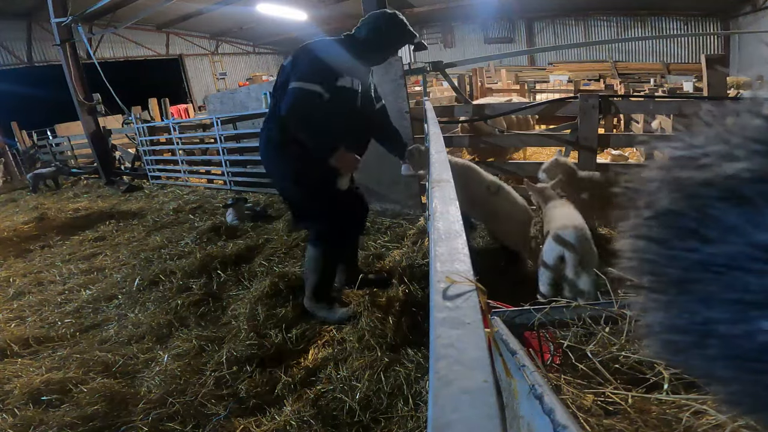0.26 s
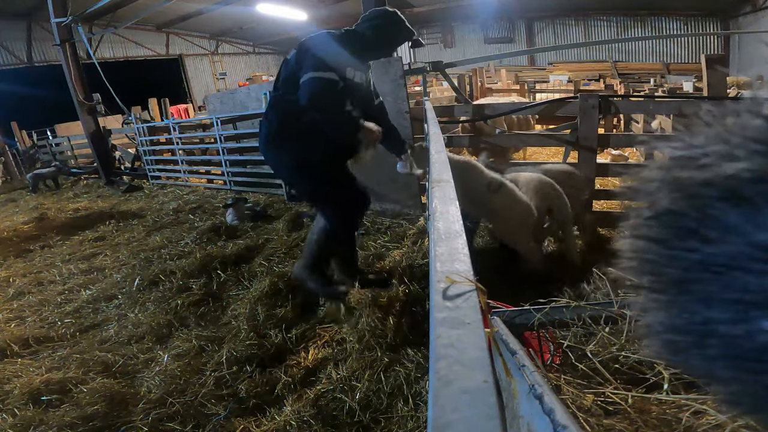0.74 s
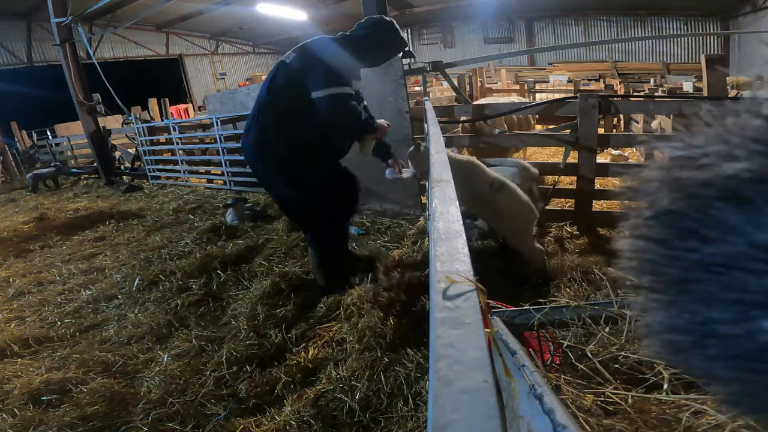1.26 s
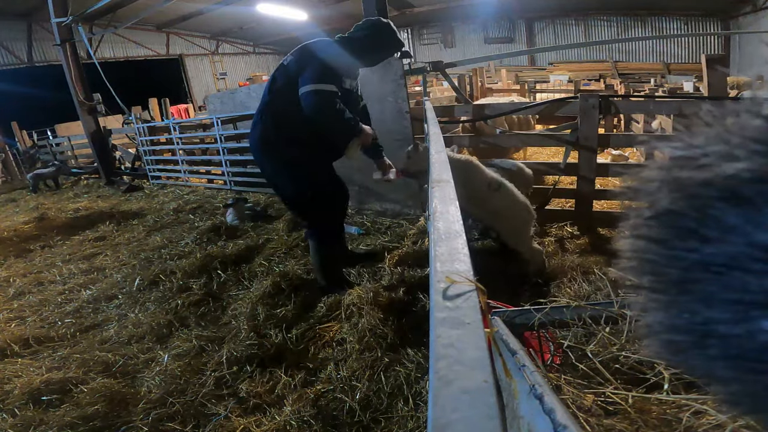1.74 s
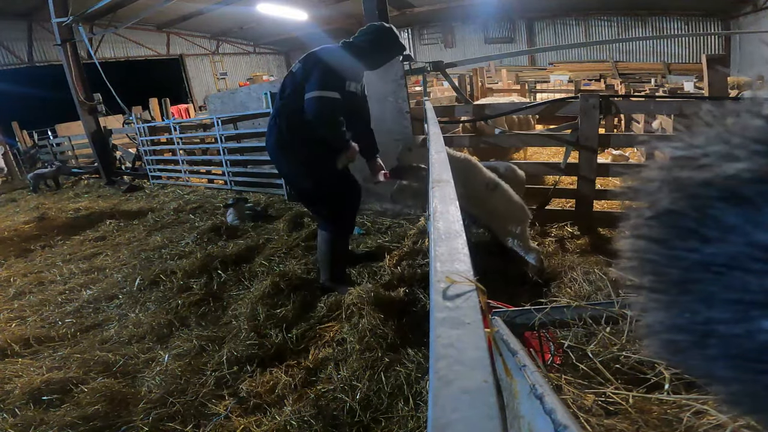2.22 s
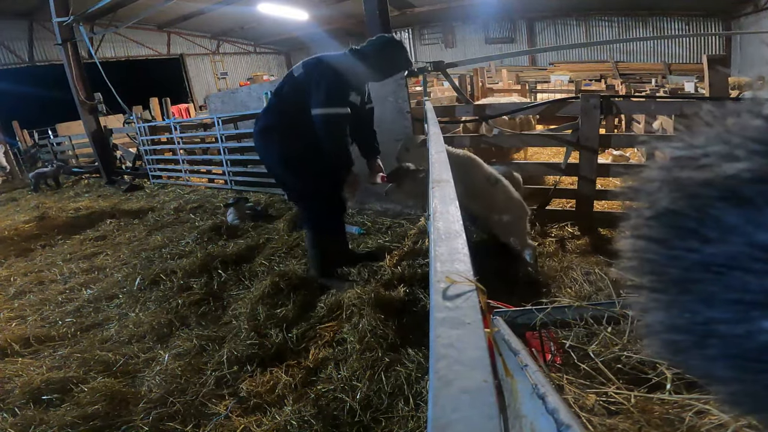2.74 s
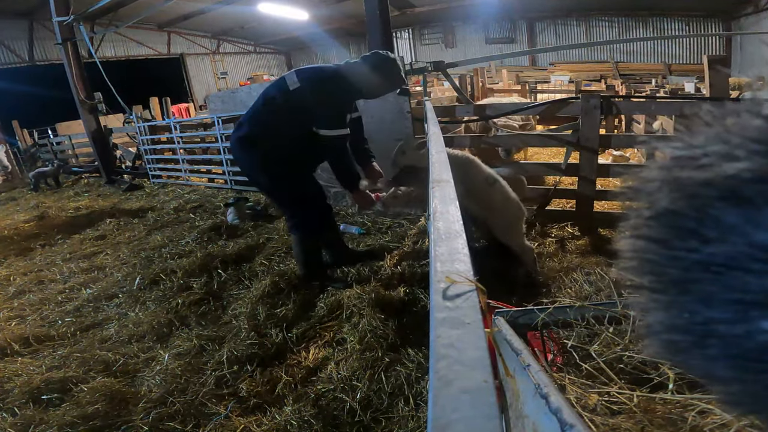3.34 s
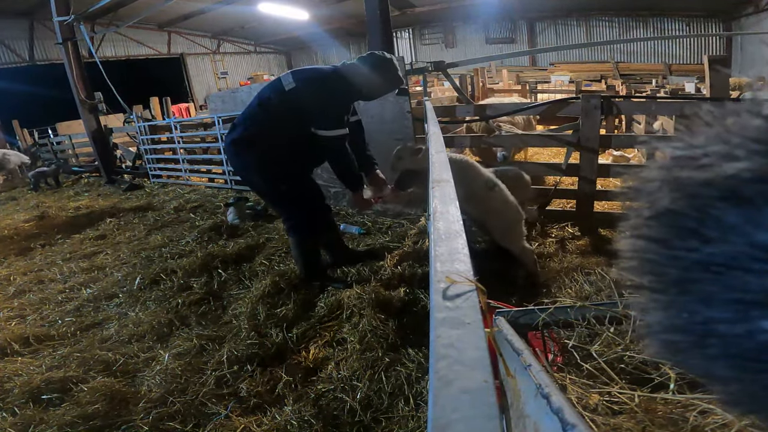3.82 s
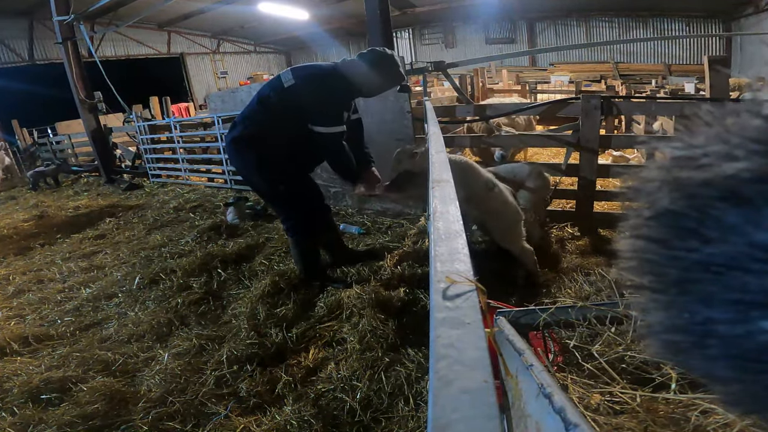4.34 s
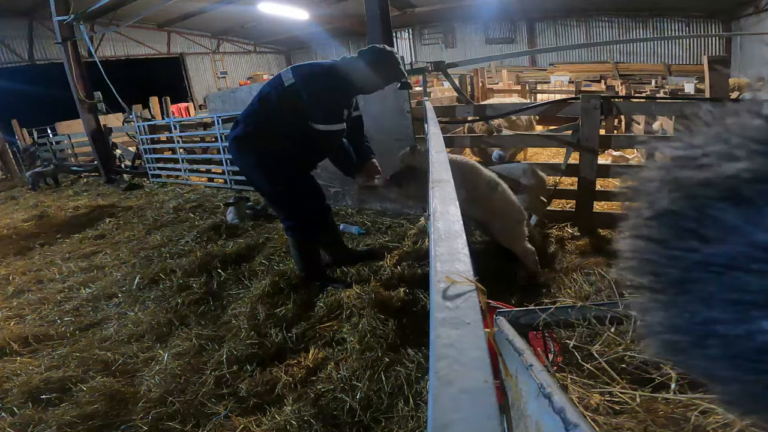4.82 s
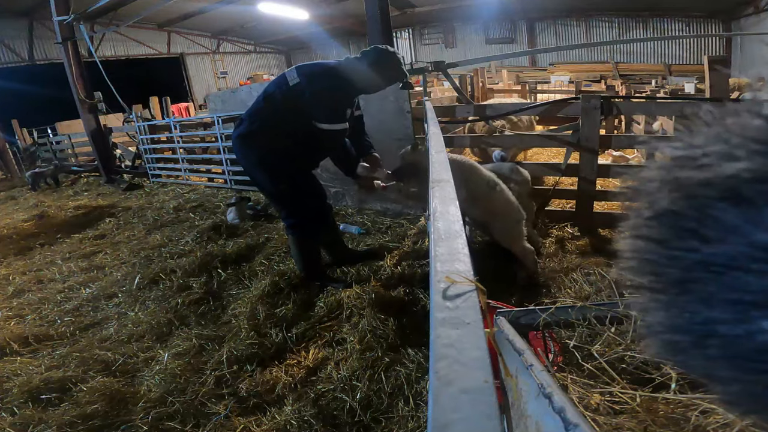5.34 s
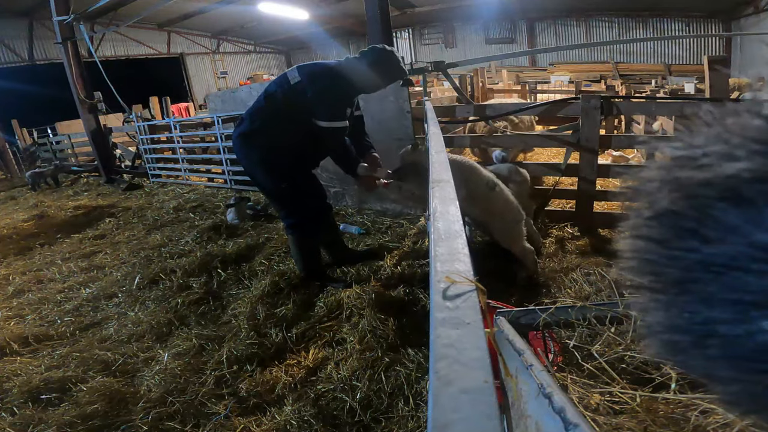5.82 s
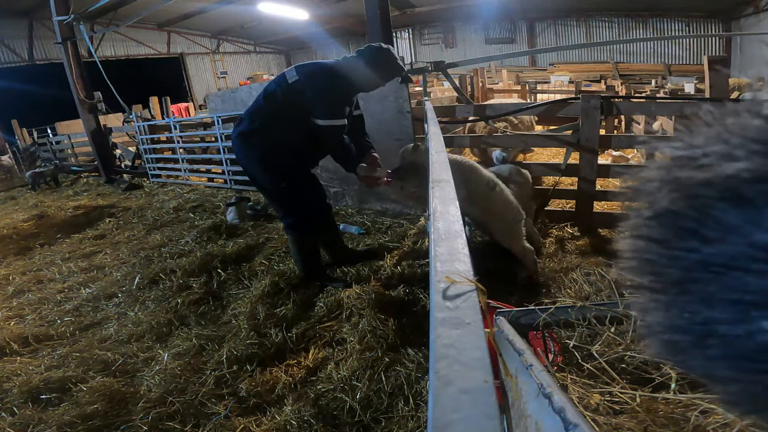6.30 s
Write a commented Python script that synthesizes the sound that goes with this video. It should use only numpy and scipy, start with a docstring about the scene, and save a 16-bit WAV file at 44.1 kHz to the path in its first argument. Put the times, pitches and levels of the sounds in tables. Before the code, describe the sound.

Lambs suck softly and shuffle in straw over the low drone of an idling diesel engine; a fence panel is knocked once.

```python
"""A three-cylinder diesel engine idles outside a lambing shed, droning, knocking and ticking.
Thin, high whines waver over it. At a pen close by, feet rustle and snap the straw, and feeding lambs
make wet smacks and a squeak as air slips past the teat; there is one low, hollow tap like a hoof or boot.
A hurdle (a fence panel) is knocked once and echoes under the roof.
The camera sways and is bumped softly, which adds a deep rumble."""
import sys
import numpy as np
from scipy import signal
from scipy.fft import rfft, irfft, next_fast_len
from scipy.io import wavfile
from scipy.ndimage import map_coordinates

SR = 44100
rng = np.random.default_rng(int(sys.argv[2]) if len(sys.argv) > 2 else 0)


def wav_out(sig):
    """Save sig, one row per channel (or a flat mono array), as 16-bit PCM at SR to the path in sys.argv[1]."""
    wavfile.write(sys.argv[1], SR, np.round(np.clip(np.atleast_2d(sig).T, -1, 1) * 32767).astype(np.int16))


N = 289721
TIME = np.arange(N) / SR

# Engine speed; in one cycle every cylinder fires once: time_s, cycles_per_s
IDLE_SPEED = [(0, 10.153), (1, 10.186), (2, 10.199), (4, 10.195), (6.5, 10.189)]


def amp(db):
    """Turn decibels into a number to multiply by."""
    return 10 ** (np.asarray(db) / 20)


def unit(x):
    """Scale a sound so its average strength (rms) is 1."""
    return x / np.sqrt(np.mean(x ** 2) + 1e-20)


def along(points, hz):
    """Read between (pitch_hz, value) points, with octaves evenly spaced."""
    pitches, values = np.transpose(points)
    return np.interp(np.log(hz + 1e-6), np.log(pitches), values)


def curves(rows):
    """Turn rows that start with a time into one curve for each other column."""
    times, *columns = np.transpose(rows)
    return [np.interp(TIME, times, column) for column in columns]


def wobble(rate):
    """A smooth curve through `rate` random values a second."""
    values = rng.standard_normal(int(N * rate / SR) + 4)
    return np.interp(TIME, TIME[::32], map_coordinates(values, [TIME[::32] * rate]))


def die_away(t, fade_s):
    """A fade that falls by 60 dB in fade_s seconds."""
    return np.exp(-np.log(1000) * t / fade_s)


def coloured(x, spectrum, tilt_db=0):
    """Set a sound's bass and treble, at strength 1; tilt_db is added per octave above 500 Hz."""
    size = next_fast_len(len(x))
    hz = np.fft.rfftfreq(size, 1 / SR)
    octaves = np.log2(np.maximum(hz, 500) / 1000)
    gain = amp(along(spectrum, hz) + tilt_db * octaves)
    return unit(irfft(rfft(x, size) * gain, size)[:len(x)])


def noise(spectrum, size=N, tilt_db=0):
    """Noise of strength 1 with the given balance of bass and treble."""
    return coloured(rng.standard_normal(size), spectrum, tilt_db)


def add(track, start_s, sound):
    """Mix a sound into the track at start_s."""
    part = track[max(round(start_s * SR), 0):][:len(sound)]
    part += sound[:len(part)]


def camera_handling(rumble_db=-15.5, rumble_growth=1.12, rub_db=-16):
    """The camera rocks and rumbles as it moves; bumps make its mount shudder and rub."""
    # How strongly the camera sways: time_s, level_db
    movement = [(0, -29), (.55, -41.5), (1.25, -23.5), (1.57, -33), (2.15, -23), (3.3, -28), (3.72, -20),
                (3.95, -30), (4.2, -26), (4.6, -33), (5.6, -30), (6, -39.5), (6.57, -34.5)]
    # Tone of the sway, the rumble and the rubbing: pitch_hz, relative_db
    sway_tone = [(1, -49), (5, -3.5), (9, -20.5), (13, 3), (19, -9), (26, -13), (40, -27.5), (80, -86),
                 (200, -120)]
    rumble_tone = [(10, -2), (30, 1), (45, 3.5), (62, -2.5), (76, -22), (100, -7), (185, -22.5), (260, -45),
                   (600, -53), (2000, -120)]
    rub_tone = [(20, -2.5), (55, 8.5), (78, -13.5), (100, 1), (140, -15), (190, -9), (250, -24), (600, -56),
                (2000, -120)]
    # Soft bumps: peak_s, level_db, pitch_hz, half_length_s
    bumps = [(0.684, -25.5, 34, 0.057), (2.058, -30.5, 51, 0.089), (2.202, -25.5, 33.3, 0.045),
             (2.574, -16, 31.4, 0.041), (2.94, -20.5, 28.8, 0.084), (3.973, -29, 33.5, 0.033),
             (4.095, -18.5, 29.7, 0.081), (5.529, -42, 29.6, 0.068)]
    sway_db, = curves(movement)
    rumble_gain = amp(sway_db.mean() + rumble_db + rumble_growth * (sway_db - sway_db.mean()))
    out = amp(sway_db) * noise(sway_tone) + rumble_gain * noise(rumble_tone)
    rub = amp(rub_db) * noise(rub_tone)
    for peak_s, db, hz, half_length_s in bumps:
        t = TIME - peak_s
        shudder = np.exp(-(t / half_length_s) ** 2) * np.cos(2 * np.pi * hz * t)
        out += amp(db) * (shudder + np.exp(-np.abs(t) / (2 * half_length_s)) * rub)
    return out


def shed_echo(x, build_s=0.034):
    """Echoes from the roof and far walls build up, then die away, the treble first."""
    # How long the echo lasts: pitch_hz, fade_s
    echo_times = [(150, 0.546), (600, 0.84), (2000, 0.53), (4000, 0.42), (8000, 0.24), (14000, 0.091)]
    hz, t, bands = signal.stft(rng.standard_normal(SR), SR, nperseg=256)
    shape = die_away(t, along(echo_times, hz)[:, None]) * (1 - np.exp(-(t / build_s) ** 2))
    tail = signal.istft(bands * shape, SR, nperseg=256)[1]
    return signal.fftconvolve(x, tail / np.linalg.norm(tail))[:N]


def straw_rustle(grain_db=2.0, fidget_db=1.5, rise_share=0.42):
    """Many tiny stalks rub together, swelling each time a foot sweeps through."""
    # The faint rustle, which dips as the lambs settle to feed: time_s, level_db
    restlessness = [(0, -64), (1.6, -68), (2.4, -61), (3.1, -67), (3.7, -64), (5.05, -77.5), (6.57, -68.5)]
    # Sweeps of a foot: peak_s, level_db, length_s
    sweeps = [(0.042, -61.5, 0.12), (0.263, -61, 0.11), (0.407, -59, 0.033), (0.533, -63, .08),
              (0.793, -59.5, 0.29), (0.944, -55.5, 0.072), (1.355, -60, 0.24), (1.87, -64.5, 0.25),
              (2.86, -59.5, .11), (3.32, -62, 0.08), (3.865, -61, 0.039), (4.05, -65, 0.11),
              (4.2, -62.5, 0.049), (4.335, -67, .03), (4.475, -65, 0.12), (4.675, -65.5, 0.15),
              (5.286, -64, .08), (5.465, -64, .05), (5.85, -67, 0.14), (6.194, -63, .16),
              (6.545, -63, 0.097)]
    # Tone of the rustle: pitch_hz, relative_db
    straw_tone = [(300, 6), (1000, 4), (2500, 5.5), (5000, 2), (6500, 7), (8200, 9.5), (10000, 3.5),
                  (13000, 3.5), (15500, -0.5)]
    power = amp(curves(restlessness)[0] + fidget_db * wobble(18)) ** 2
    for peak_s, db, length_s in sweeps:
        width_s = length_s * np.where(TIME < peak_s, rise_share, 1 - rise_share)
        power += amp(db) ** 2 * np.exp(-np.minimum(((TIME - peak_s) / width_s) ** 2, 20))
    grains = rng.standard_normal(N) * amp(grain_db * wobble(900))
    return np.sqrt(power) * coloured(grains, straw_tone)


def straw_snaps():
    """Stalks bend, give way and settle."""
    # Snaps, scuffs and steps: peak_s, level_db, rise_s, fade_s, brightness_db_per_octave
    snaps = [(0.251, -48, 0.012, 0.04, -3), (0.527, -55, .002, .04, 16), (0.962, -43.5, 0.019, .11, -5.5),
             (1.054, -48, 0.014, 0.16, -12), (1.9, -50, 0.0019, 0.044, -3),
             (1.985, -37, 0.005, 0.046, -4.5), (1.989, -37, 0.0013, 0.026, 6),
             (1.996, -43.5, 0.0042, 0.26, -3), (2.191, -47, 0.0029, 0.044, -3), (2.871, -55, 0.03, .1, 1),
             (3.33, -50.5, 0.03, 0.087, 0.5), (3.486, -49.5, 0.0098, 0.092, -1.5),
             (3.722, -43.5, 0.00084, 0.065, -6.5), (3.824, -43.5, .002, 0.018, 1),
             (5.274, -41.5, 0.00055, 0.021, 1), (6.24, -56, .02, .15, -2)]
    # Tone of a stalk: pitch_hz, relative_db
    stalk_tone = [(200, -19), (550, -0.5), (1000, 3.5), (1200, -2), (1620, 8), (2800, -0.5), (4350, 0.5),
                  (5500, -1.5), (6700, -6), (8100, 4), (9500, -11), (13000, -14.5), (15500, -32)]
    out, t = np.zeros(N), np.arange(-SR // 8, SR // 4) / SR
    for peak_s, db, rise_s, fade_s, bright_db in snaps:
        shape = np.where(t < 0, np.exp(-np.abs(t) / rise_s), die_away(np.abs(t), fade_s))
        add(out, peak_s + t[0], amp(db) * shape * noise(stalk_tone, len(t), tilt_db=bright_db))
    return out


def hollow(hz, size, sharpness=4.75):
    """Noise narrowed around one pitch, as in a hollow such as a mouth."""
    b, a = signal.iirpeak(hz, sharpness, SR)
    hiss = signal.lfilter(b, a, rng.standard_normal(size))
    return unit(signal.lfilter(b, a, hiss))  # a second pass narrows it further


def sucking_and_tap(second_db=-3, roughness=0.53):
    """Air slips past the teat in wet smacks and a falling squeak; one low tap is like a hoof or boot."""
    # Smacks, and the tap at 3.726 s: peak_s, level_db, half_length_s, main_pitch_hz, second_pitch_hz
    bursts = [(2.512, -50.5, 0.015, 2320, 3400), (2.726, -48, 0.007, 2230, 3160),
              (2.983, -53, .008, 2230, 3200), (3.726, -36.5, 0.0056, 1030, 610),
              (4.919, -45.5, 0.003, 2280, 2850), (6.237, -56, 0.024, 3450, 2770),
              (6.503, -52, 0.0078, 3280, 3950)]
    # The teat's squeak: time_s, pitch_hz, level_db
    squeak = [(4.735, 1145, -60), (4.752, 1077, -50), (4.77, 915, -46), (4.783, 950, -45), (4.8, 940, -66)]
    out, t = np.zeros(N), np.arange(-SR // 16, SR // 16) / SR
    for peak_s, db, half_length_s, main_hz, second_hz in bursts:
        burst = unit(hollow(main_hz, len(t)) + amp(second_db) * hollow(second_hz, len(t)))
        add(out, peak_s + t[0], amp(db) * np.exp(-(t / half_length_s) ** 2) * burst)
    pitch_hz, level_db = curves(squeak)
    tone = unit(np.sin(2 * np.pi * np.cumsum(pitch_hz) / SR) * (1 + roughness * wobble(400)))
    squeaking = (TIME > squeak[0][0]) & (TIME < squeak[-1][0])
    return out + amp(level_db) * tone * squeaking


def hurdle_knock(ring_db=-5, crack_db=-0.5, rattle=0.023, rise_s=0.0028):
    """Each contact cracks and sets the hurdle ringing; its loose joints blur the notes."""
    # Three quick contacts that make one knock: start_s, level_db
    contacts = [(3.845, -39), (3.853, -33), (3.889, -42)]
    # The notes the hurdle rings at: pitch_hz, relative_db, fade_s
    notes = [(181.3, 7.5, 0.43), (366, -8.5, 0.13), (430, -2.5, 0.25), (573, -2, 0.12), (768, -9.5, 0.34),
             (997, -12.5, 0.24), (1320, -16, 0.12), (1740, -5, 0.13), (2160, -14, .15), (2620, -13, .12),
             (5540, -15, .06)]
    # Tone of the crack: pitch_hz, relative_db
    crack_tone = [(100, -24), (300, 2), (550, 8), (1050, -2), (1400, 2.5), (2000, 2), (2700, -3),
                  (3600, -8), (4700, -12), (5700, -5.5), (7000, -11.5), (8500, -12.5), (11000, -21.5),
                  (15000, -42)]
    out, t = np.zeros(N), np.arange(SR // 2) / SR
    for start_s, db in contacts:
        sound = amp(crack_db) * die_away(t, fade_s=0.16) * noise(crack_tone, len(t))
        for hz, note_db, fade_s in notes:
            phase = 2 * np.pi * np.cumsum(hz * (1 + rattle * wobble(310)[:len(t)])) / SR
            sound += amp(ring_db + note_db) * die_away(t, fade_s) * np.sin(phase)
        add(out, start_s, amp(db) * (1 - np.exp(-t / rise_s)) * sound)
    return out


def whines(wander_db=1.3, flutter_db=4.0, drift_hz=15, swell_db=7, swell_half_s=0.12):
    """Three thin tones flutter quickly and swell now and then, each on its own."""
    # The low, middle and high whine: pitch_hz
    pitches = [3966, 4714, 6433]
    # How loud each is and when it swells: base_level_db, swell_times_s
    levels = [(-71.5, [1.2, 4.25]), (-72, [.43, 3.48, 6.03]), (-77, [.33, 1.35, 1.75, 2.42, 6.35])]
    out = np.zeros(N)
    for hz, (db, swell_times) in zip(pitches, levels):
        phase = 2 * np.pi * np.cumsum(hz + drift_hz * wobble(150)) / SR
        swells = sum(np.exp(-((TIME - peak_s) / swell_half_s) ** 2) for peak_s in swell_times)
        waver = amp(wander_db * wobble(5) + flutter_db * wobble(50))
        out += amp(db + swell_db * swells) * unit(waver * np.sin(phase))
    return out


def exhaust(cycles, scatter_db=2, size=8192, tone_count=300):
    """Unequal cylinders throb once a cycle: a stack of tones whose timing the walls scramble."""
    # Tones that stand out: multiple_of_cycle_rate, level_db
    strong_tones = [(3, -41), (5, -71), (6, -51.5), (8, -58), (9, -63.5), (11, -56.5), (12, -47.5),
                    (14, -55.5), (15, -44.5), (16, -55.5), (21, -63.5), (23, -63), (25, -63), (28, -62.5),
                    (33, -61.5), (34, -69), (35, -63), (36, -59.5), (38, -64.5), (39, -64), (41, -63),
                    (44, -67), (51, -64), (57, -76), (58, -68), (63, -67.5), (75, -68), (111, -70),
                    (120, -85)]
    # The weaker tones around them: pitch_hz, level_db
    weak_tones = [(20, -91), (75, -101), (110, -59), (250, -75.5), (500, -78), (800, -81), (1300, -83.5),
                  (2000, -87.5), (3000, -94.5)]
    # How far the walls shift a strong tone's timing (its phase): pitch_hz, share_0_to_1
    scramble = [(100, 0.15), (165, 0.19), (250, 1), (335, 0.38), (420, 0.32), (500, 0.99)]
    hz = np.arange(tone_count) * IDLE_SPEED[-1][1]
    level_db = along(weak_tones, hz) + scatter_db * rng.standard_normal(tone_count)
    phase = rng.uniform(-np.pi, np.pi, tone_count)
    for multiple, db in strong_tones:
        level_db[multiple] = db
        phase[multiple] *= along(scramble, hz[multiple])
    one_cycle = irfft(1j * amp(level_db) * np.exp(1j * phase), size) * size / np.sqrt(2)
    return np.interp(cycles % 1, np.arange(size) / size, one_cycle)


def diesel_engine(fan_db=-50, knock_db=-62, tick_db=-67.5, scatter_db=2.6, unsteady=0.0017):
    """The exhaust drones, the fan rushes, and each of the three cylinders knocks and ticks as it fires."""
    # Tone of the clatter and the fan: pitch_hz, relative_db
    clatter_tone = [(40, 5.5), (80, -1.5), (170, 7.5), (230, -1), (400, 0), (600, -5.5), (1000, -9),
                    (1400, -12.5), (2100, -8), (3000, -14.5), (4400, -17), (5400, -17.5), (6000, -23),
                    (8200, -25), (10000, -31.5), (15500, -41)]
    # The thin ring of the ticking: pitch_hz, relative_db
    tick_tone = [(3500, -20), (4600, -24), (4950, -10.5), (5350, -10), (5500, -8), (5700, -33), (7200, -40),
                 (7900, -16), (9000, -41), (15000, -55)]
    cycles = np.cumsum(curves(IDLE_SPEED)[0]) / SR + unsteady * wobble(12)
    firing, progress = np.divmod(3 * cycles + 0.065, 1)  # progress runs 0 to 1 between firings
    firing = firing.astype(int)
    cylinder_db = np.array([-4, 0, 0])[firing % 3]  # one cylinder is softer
    force = amp(cylinder_db + scatter_db * rng.standard_normal(firing.max() + 1)[firing])
    soft_start = 1 - np.exp(-progress / 0.026)  # distance rounds off each blow
    blows = unit(force * np.exp(-3.5 * progress) * soft_start)
    knocks = amp(knock_db) * blows * noise(clatter_tone, tilt_db=2.0)
    ticks = amp(tick_db) * blows * noise(tick_tone)
    fan = amp(fan_db + 0.3 * wobble(5.36)) * noise(clatter_tone)
    return exhaust(cycles) + fan + knocks + ticks


def scene():
    """Mix it all in one channel; the pen is close, while the hurdle is farther off and echoes more."""
    pen = straw_snaps() + sucking_and_tap()
    knock = hurdle_knock()
    echoes = shed_echo(amp(-23.5) * pen + amp(-6) * knock)
    return (diesel_engine() + whines() + straw_rustle() + pen + knock + echoes + camera_handling())[None]


def record(dry):
    """Cut away the very highest treble."""
    top_hz = 15720
    size = next_fast_len(N + SR // 2)
    kept = np.fft.rfftfreq(size, 1 / SR) < top_hz
    return irfft(rfft(dry, size) * kept, size)[:, :N]


dry = scene()
out = record(dry)
wav_out(out)
```